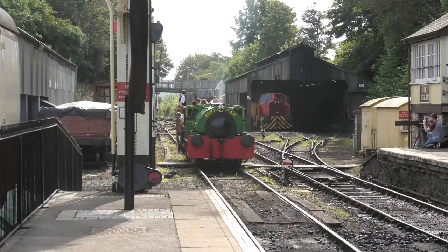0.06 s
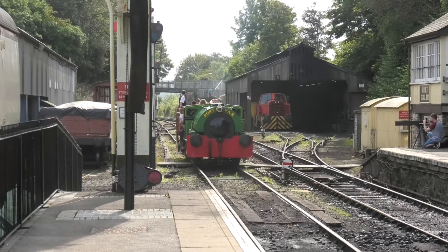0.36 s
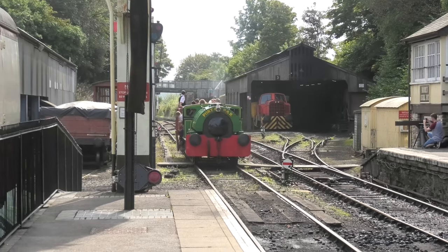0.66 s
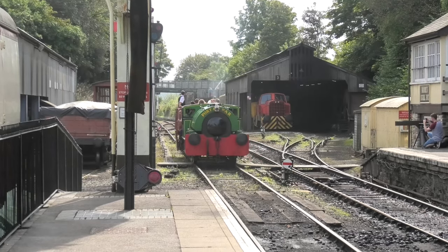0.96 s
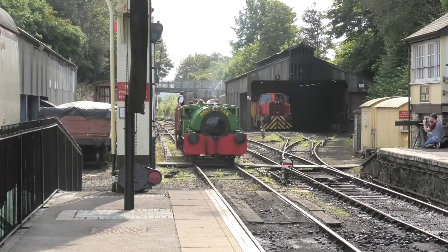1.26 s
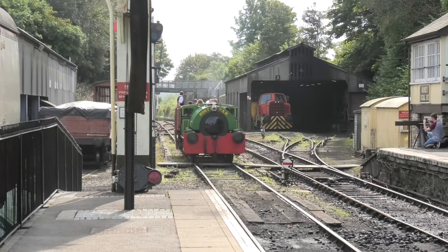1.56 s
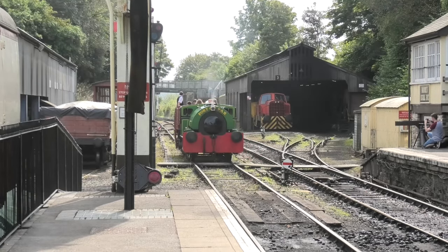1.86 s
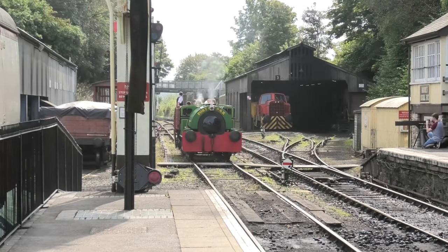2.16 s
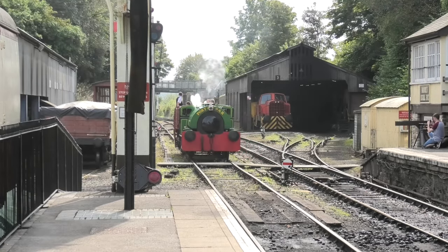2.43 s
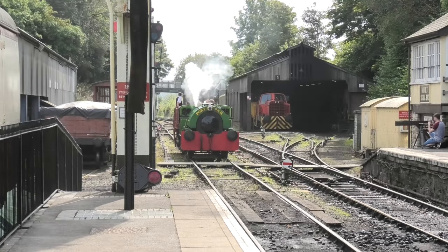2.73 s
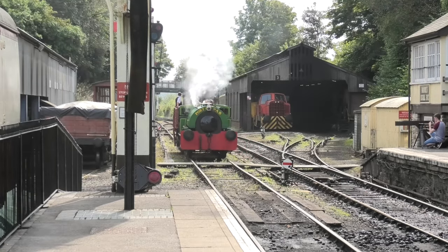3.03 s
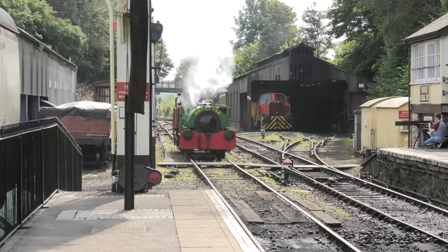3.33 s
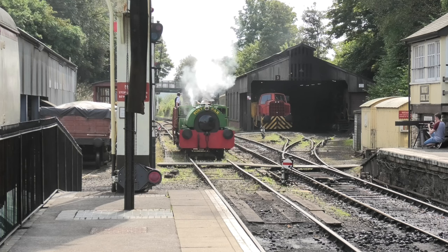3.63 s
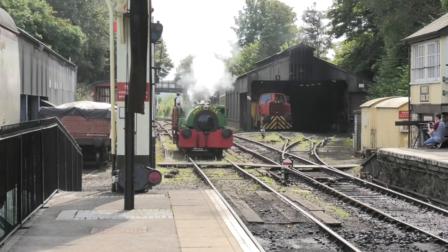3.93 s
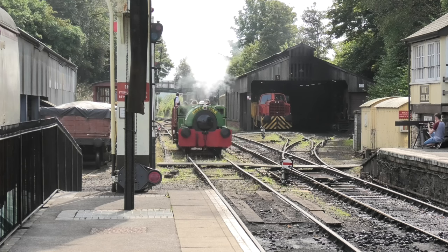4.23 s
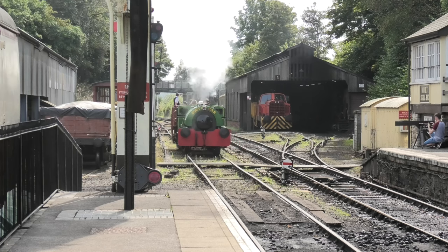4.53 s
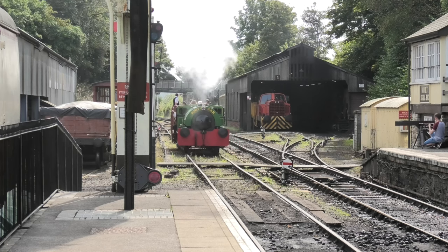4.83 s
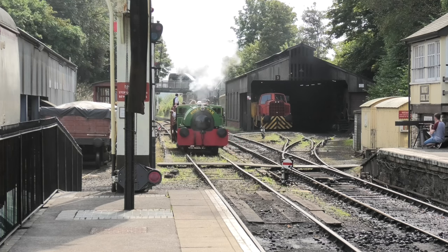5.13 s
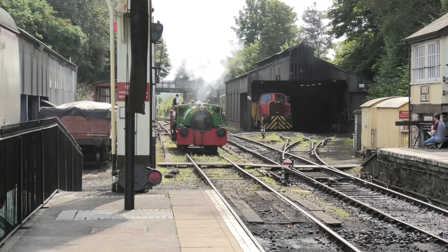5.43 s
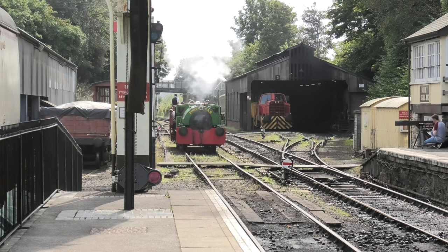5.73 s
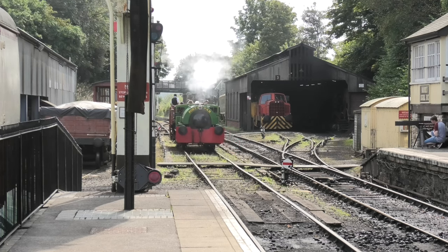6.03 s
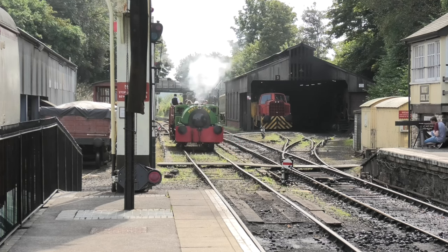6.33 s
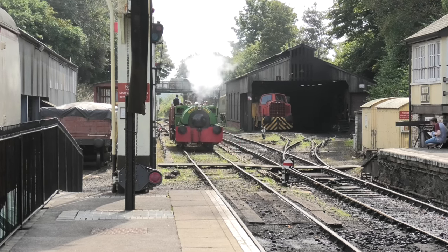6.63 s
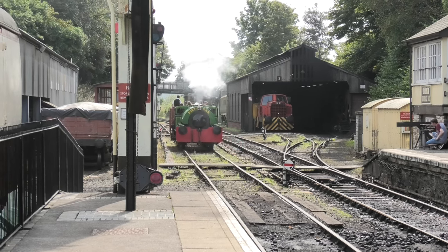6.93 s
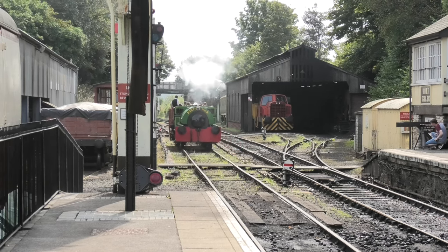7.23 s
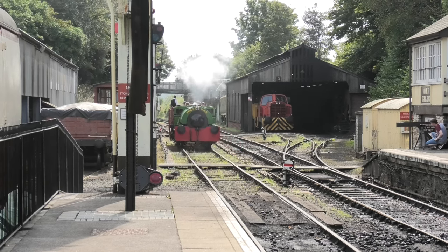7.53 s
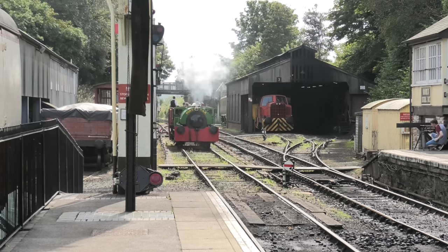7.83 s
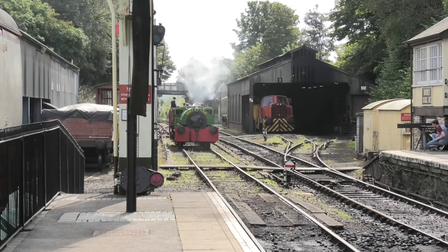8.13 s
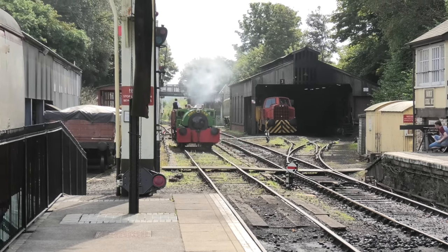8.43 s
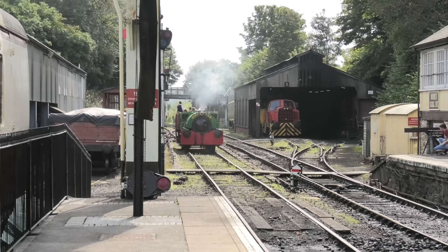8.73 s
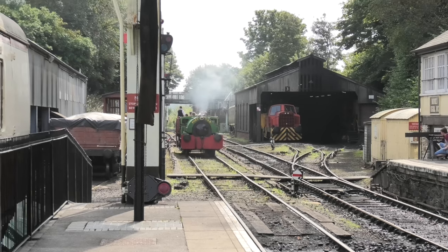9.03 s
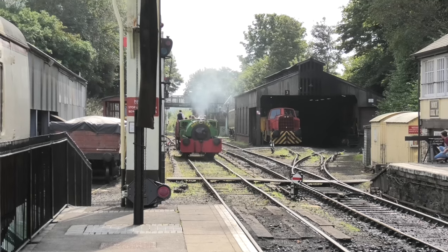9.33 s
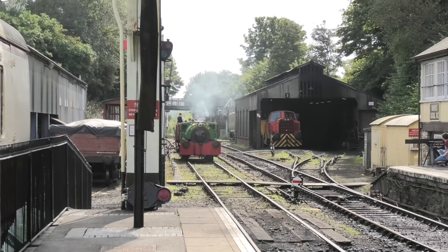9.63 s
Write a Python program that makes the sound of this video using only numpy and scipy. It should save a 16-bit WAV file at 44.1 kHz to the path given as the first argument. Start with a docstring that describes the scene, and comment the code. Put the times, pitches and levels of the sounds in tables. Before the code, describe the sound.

A small steam locomotive rolls slowly away with soft chuffs, a steady hiss, a low rumble and the thin, high note of a steam leak. Wet steam suddenly rushes out, and one loud whistle blast slides up to pitch, holds for about a second and cuts off with a brief echo. The quiet chuffing fades while the hiss carries on with a few spits, heard from a platform in an open rail yard.

```python
"""A steam whistle gives one blast: wet steam rushes out, then the whistle's bell (its hollow tube)
sounds a note that slides up to pitch and holds. It sits on a small tank engine backing away from a
platform. The engine chuffs softly, hisses, rumbles and clanks, while a steam leak sings a thin note.
Sheds and trees around the yard echo back. The sound is mono."""
import sys
import numpy as np
from scipy import signal
from scipy.fft import rfft, irfft, next_fast_len
from scipy.io import wavfile
from scipy.ndimage import uniform_filter1d, map_coordinates

SR = 44100
rng = np.random.default_rng(int(sys.argv[2]) if len(sys.argv) > 2 else 0)


def store_pcm(level_fs):
    """Save levels as 16-bit WAV."""
    pcm = np.round(np.clip(level_fs, -1, 1) * 32767).astype(np.int16)
    wavfile.write(sys.argv[1], SR, np.atleast_2d(pcm).T)


N = 426447


def amp(db):
    """Turn decibels into a gain to multiply by."""
    return 10 ** (np.asarray(db) / 20)


def unit(x):
    """Scale a sound to an average (rms) size of 1."""
    return x / np.sqrt(np.mean(x ** 2) + 1e-20)


def clock():
    """The time of every sample, in seconds."""
    return np.arange(N) / SR


def along(points, hz):
    """Read between (frequency, value) points, giving each octave equal room."""
    freqs, values = np.transpose(points)
    return np.interp(np.log(hz + 1), np.log(freqs + 1), values)


def curve(points):
    """Join (time, value) points with straight lines, one value per sample."""
    times, values = np.transpose(points)
    return np.interp(clock(), times, values)


def settling(start_s, rise_s):
    """Rise from 0 towards 1, quickly at first and then more slowly."""
    return 1 - np.exp(-np.maximum(clock() - start_s, 0) / rise_s)


def wobble(rate):
    """A smooth curve through `rate` random values a second."""
    return map_coordinates(rng.standard_normal(int(N * rate / SR) + 4), [clock() * rate])


def wavering(phase, depth, rate):
    """A trembling tone, about as strong as a steady one."""
    tone = (1 + depth * wobble(rate)) * np.sin(phase) + depth * wobble(rate) * np.cos(phase)
    return tone / np.sqrt(1 + 2 * depth ** 2)


def filtered(x, response):
    """Turn each frequency of x up or down by response(hz)."""
    size = next_fast_len(N + SR // 2)
    return irfft(rfft(x, size) * response(np.fft.rfftfreq(size, 1 / SR)), size)[..., :N]


def resonance(hz, centre_hz, width_hz):
    """How something that rings at centre_hz answers each frequency."""
    return 1j * hz * width_hz / (centre_hz ** 2 - hz ** 2 + 1j * hz * width_hz)


def rush(colour, patchy_db):
    """Rushing noise with random loud and soft patches; colour sets the balance of low and high."""
    spectrum = signal.stft(rng.standard_normal(N), nperseg=512)[2]
    patches = uniform_filter1d(rng.standard_normal(spectrum.shape), size=5, axis=0)
    patches = uniform_filter1d(patches, size=9, axis=1)
    noise = signal.istft(spectrum * amp(patchy_db * unit(patches)), nperseg=512)[1][:N]
    low_hz, high_hz = colour[0][0], colour[-1][0]
    edge_fade = lambda hz: np.minimum(1, hz / low_hz) ** 2 / np.maximum(1, hz / high_hz) ** 2
    return unit(filtered(noise, lambda hz: amp(along(colour, hz)) * edge_fade(hz)))


def puffs(rows, sharpness, rise_s, fall_s):
    """A noise burst for each (time, level, frequency) row; more sharpness makes it more like a note."""
    out = np.zeros(N + 2 * SR)  # a spare second at each end
    t = np.arange(-SR // 4, SR // 4) / SR
    hz = np.fft.rfftfreq(len(t), 1 / SR)
    shape = np.exp(-(np.minimum(t, 0) / rise_s) ** 2 - np.maximum(t, 0) / fall_s)
    for peak_s, db, centre_hz in rows:
        band = resonance(hz, centre_hz, centre_hz / sharpness) ** 2
        noise = irfft(rfft(rng.standard_normal(len(t))) * band, len(t))
        start = round((peak_s + 1 + t[0]) * SR)
        out[start:][:len(t)] += amp(db) * unit(noise * shape) * np.sqrt(np.mean(shape ** 2))
    return out[SR:SR + N]


# How late and how strongly each wall answers: t/s, level/dB
WALL_ECHOES = [(.06, -26), (.19, -25), (.29, -24), (.69, -40.5)]
# How long the yard's ring takes to fade by 60 dB: f/Hz, t/s
YARD_FADE = [(200, 0.48), (600, 0.88), (2000, 0.8), (6000, 0.79), (14000, 0.39)]
# Leaves scatter high sounds more than low ones: f/Hz, level/dB
LEAF_SCATTER = [(600, -14), (1400, -9.5), (3500, -11), (8000, -7)]
def yard(x, dull_above_hz=1800):
    """Sheds send back dull echoes; trees and platforms add a soft, fading tail."""
    hz, t, spectrum = signal.stft(rng.standard_normal(SR), SR, nperseg=256)
    fade = amp(-60 * t / along(YARD_FADE, hz)[:, None])
    tail = signal.istft(spectrum * fade, SR, nperseg=256)[1]
    scattered = signal.fftconvolve(x, tail / np.linalg.norm(tail))[:N]
    scattered = filtered(scattered, lambda f: amp(along(LEAF_SCATTER, f)))
    echoes = sum(amp(db) * np.pad(x, (round(delay_s * SR), 0))[:N] for delay_s, db in WALL_ECHOES)
    return scattered + filtered(echoes, lambda f: 1 / (1 + (f / dull_above_hz) ** 2))


# How loud the hollow tone is: t/s, level/dB
DRONE_LEVEL = [(0, -79), (1.2, -80), (2, -89), (5.5, -79), (6.5, -75.5), (7.8, -70.5), (8.3, -83)]
def drone(pitch_hz=718):
    """A faint, fuzzy, hollow tone as the engine rolls away."""
    tone = wavering(2 * np.pi * pitch_hz * clock(), depth=.9, rate=22)
    return amp(curve(DRONE_LEVEL)) * unit(tone)


# How loud the rumble is: t/s, level/dB
RUMBLE_LEVEL = [(0, -57.5), (1.9, -60.5), (2.45, -55.5), (4.8, -59), (6.9, -58.5), (7.8, -61.5),
                (9.67, -61)]
# Its deep tone colour: f/Hz, level/dB
RUMBLE_COLOUR = [(30, -24), (50, -8), (100, -6.5), (125, -4), (175, 1), (240, 1.5), (330, -3.5), (420, -10),
                 (700, -10.5), (900, -18)]
def rumble():
    """The wheels and rods rumble as the engine rolls."""
    return amp(curve(RUMBLE_LEVEL)) * rush(RUMBLE_COLOUR, patchy_db=1.5)


# Tone colour of the boiler: f/Hz, level/dB
SIMMER_COLOUR = [(400, -20), (720, -22.5), (850, -10), (1130, -9), (1250, -1), (1390, 0.5), (1490, -2.5),
                 (1640, 2), (1880, -7.5), (2120, -0.5), (2300, -2), (2600, -9), (3300, -16), (5000, -53)]
def simmer(level_db=-54.0, start_m=32, speed_m_per_s=1.07):
    """The boiler simmers, growing fainter as the engine backs away."""
    nearness = start_m / (start_m + speed_m_per_s * clock())
    return nearness * amp(level_db + 0.74 * wobble(3.85)) * rush(SIMMER_COLOUR, patchy_db=1.0)


# One high squeal and one low groan: t/s, level/dB, f/Hz
GROANS = [(.1, -54.5, 1387), (2.32, -59, 182.4)]
def groans():
    """Steel briefly squeals and groans as the engine rolls."""
    return puffs(GROANS, sharpness=20, rise_s=.12, fall_s=0.073)


# Knocks of metal on metal: t/s, level/dB, f/Hz
CLANKS = [(1.37, -46, 199), (1.38, -59, 11000), (1.39, -54, 895), (4.345, -59.5, 9000), (7.75, -57, 1043),
          (8.1, -57, 990)]
def clanks():
    """The moving rods clank and tick."""
    return puffs(CLANKS, sharpness=2.3, rise_s=0.0034, fall_s=0.02)


# Spits of steam, before distance dulls them: t/s, level/dB, f/Hz
SPITS = [(1.375, -47, 2950), (4.34, -53, 7000), (6.8, -51, 4950), (7.46, -56, 5040), (7.65, -56, 3960),
         (8.61, -50.5, 4460), (8.74, -50, 4600), (8.81, -50.5, 5540)]
def spits(dull_above_hz=9000):
    """Wet steam spits in short, spluttering bursts; distance takes their edge off."""
    bursts = amp(2.3 * wobble(150)) * puffs(SPITS, sharpness=1.02, rise_s=0.025, fall_s=0.045)
    return filtered(bursts, lambda hz: 1 / np.sqrt(1 + (hz / dull_above_hz) ** 10))


# How loud the sizzle is: t/s, level/dB
SIZZLE_LEVEL = [(0, -78), (5.3, -66.5), (6.5, -62), (6.8, -70), (7.0, -56.5), (7.35, -56.5), (7.65, -67),
                (7.9, -64), (8.2, -82)]
# Its narrow tone colour: f/Hz, level/dB
SIZZLE_COLOUR = [(4100, -17), (4420, 4), (4600, 0), (4750, 3), (4920, -34)]
def sizzle():
    """A thin, high sizzle in the steam escaping at the rod seals."""
    return amp(curve(SIZZLE_LEVEL)) * rush(SIZZLE_COLOUR, patchy_db=3.5)


# Tone colour of the hiss facing the platform: f/Hz, level/dB
HISS_NEAR = [(1500, -14), (2250, 5.5), (2650, 4.5), (2850, 10.5), (3400, 6), (3700, 7.5), (4300, 2),
             (4650, 5), (5200, -3.5), (5600, 0), (7800, -7), (9100, -7.5), (13300, -21.5), (15700, -30)]
# Its colour from farther down the line: f/Hz, level/dB
HISS_FAR = [(2000, -32), (2900, 1), (3300, 3), (3720, 4), (4150, 1), (4680, 1), (4900, -4.5), (5330, -3.5),
            (5580, -1), (6300, -3.5), (7800, -7.5), (9100, -8), (12000, -18), (15000, -32)]
# How the hiss swells and sinks: t/s, level/dB
HISS_SWELL = [(0, -59.5), (1.2, -57.3), (1.9, -60), (2.3, -57.3), (4.3, -57.3), (5.3, -60.3), (5.62, -53.8),
              (6.4, -53.6), (7.5, -54.5), (7.8, -60.5), (8.3, -57.5), (9.15, -60.5), (9.67, -56)]
def seal_hiss(near_db=4, splutter_db=1.48, surge_db=1.22, ground_db=-14, ground_delay_s=0.001063):
    """Steam hisses past the seals around the rods; drops of water make it splutter."""
    far = rush(HISS_FAR, patchy_db=2.0)
    # from farther off, the hiss also bounces off the ground
    ground_bounce = lambda hz: 1 + amp(ground_db) * np.exp(-2j * np.pi * hz * ground_delay_s)
    far = unit(filtered(far, ground_bounce))
    near = amp(near_db) * rush(HISS_NEAR, patchy_db=0.6)
    far_share = np.clip((clock() - 4.3) / 1.7, 0, 1)
    hiss = np.sqrt(1 - far_share) * near + np.sqrt(far_share) * far
    return hiss * amp(curve(HISS_SWELL) + splutter_db * wobble(220) + surge_db * wobble(35))


# Start and chuff strength of each wheel turn, quickening until the driver eases off: t/s, level/dB
WHEEL_TURNS = [(.11, -54), (1.16, -54), (2.18, -57), (3.17, -57), (4.13, -54.5), (5.04, -56.5), (5.93, -55),
               (6.81, -59.5), (7.71, -64), (8.61, -67), (9.52, -64)]
# The beats within one turn: share of the turn, added level/dB, f/Hz
TURN_BEATS = [(0, 2, 340), (.215, 0, 310), (.475, -.5, 305), (.75, -0.5, 320)]
def chuffs():
    """Used steam puffs from the chimney in four uneven beats for each turn of the wheels."""
    starts, levels = np.transpose(WHEEL_TURNS)
    lengths = np.pad(np.diff(starts), (0, 1), mode="edge")
    beats = [(start + share * length, level + db, hz)
             for start, level, length in zip(starts, levels, lengths)
             for share, db, hz in TURN_BEATS]
    heard = [beat for beat in beats if beat[0] < N / SR]
    return puffs(heard, sharpness=1.56, rise_s=0.026, fall_s=0.026)


# Pitch of the leak's note: t/s, f/Hz
LEAK_PITCH = [(0, 2352), (1.3, 2365), (4.25, 2367), (4.9, 2373), (5.5, 2375), (6.9, 2370), (8, 2373),
              (9.67, 2373)]
# How the note swells and dips: t/s, level/dB
LEAK_SWELL = [(0, -49.5), (1.3, -45), (1.98, -51.5), (2.1, -47.5), (2.6, -49.5), (3.9, -48), (4.5, -54),
              (4.75, -49.5), (5.3, -50.5), (6.25, -47.5), (6.4, -62), (6.52, -46.5), (7.38, -54.5),
              (7.52, -49), (8.1, -51), (8.32, -62), (8.58, -49.5), (8.84, -48), (8.94, -56), (9.02, -46),
              (9.48, -46), (9.58, -54), (9.67, -47)]
def leak(gain_db=-1.5, drift_hz=3, flicker_db=1.0):
    """Leaking steam blows across an edge and sings a thin, unsteady note."""
    phase = 2 * np.pi * np.cumsum(curve(LEAK_PITCH) + drift_hz * wobble(25)) / SR
    loudness = amp(curve(LEAK_SWELL) + gain_db + flicker_db * wobble(10))
    return loudness * unit(wavering(phase, depth=0.27, rate=60))


# The whistle's valve opens, the note starts once the water has blown clear, the valve shuts
OPEN_S, NOTE_START_S, SHUT_S = 2.432, 2.783, 3.977
def valve(opening_s=.02, closing_s=.012):
    """How far the whistle's valve is open, from 0 to 1: it snaps open and springs shut."""
    t = clock()
    return np.clip((t - OPEN_S) / opening_s, 0, 1) * np.exp(-np.maximum(t - SHUT_S, 0) / closing_s)


# Two low, hoarse coughs: t/s, level/dB, f/Hz
COUGHS = [(2.515, -48, 300), (2.755, -49, 410)]
def coughs():
    """The whistle coughs while it is still full of water."""
    return puffs(COUGHS, sharpness=1.9, rise_s=.035, fall_s=.035)


# Tone colour of the steam jet: f/Hz, level/dB
JET_COLOUR = [(150, -33), (450, -12.5), (750, -12), (1100, -11), (1400, -5.5), (1900, 0), (2450, -4),
              (2950, 3), (3250, -1), (3650, 1), (4350, -4.5), (5000, -3), (6500, -10.5), (9000, -32)]
# Tone colour of the fine spray: f/Hz, level/dB
SPRAY_COLOUR = [(2500, -23), (4500, -4), (5500, -2.5), (6400, -5.5), (7200, 1.5), (8000, -4.5),
                (9100, -1.5), (10500, -7.5), (12500, -9.5), (15700, -15)]
# Spurts of water that boost the spray: t/s, added level/dB, fade t/s
WATER_SPURTS = [(3.08, 5, 0.24), (3.34, 5.5, 0.034)]
def steam_jet(wet_db=-39, dry_db=-31.5, spray_db=-37, lag_s=.028):
    """Steam and spray tear through the whistle's slot; the steam rushes harder once it runs dry."""
    surge = amp(0.38 * wobble(40))
    steam_db = wet_db + (dry_db - wet_db) * settling(NOTE_START_S, rise_s=.09)
    steam = amp(steam_db) * rush(JET_COLOUR, patchy_db=2.1)
    steam *= settling(OPEN_S + lag_s, rise_s=.012)  # starts a moment after the spray
    spurts_db = 0
    for peak_s, db, fade_s in WATER_SPURTS:
        rise = np.clip((clock() - peak_s) / 0.052 + 1, 0, 1)
        spurts_db += db * rise * (1 - settling(peak_s, fade_s))
    spray = amp(spray_db + spurts_db) * rush(SPRAY_COLOUR, patchy_db=2.0)
    spray *= settling(OPEN_S, rise_s=0.086)
    return surge * (steam + spray)


# Where the air inside the bell rings: f/Hz, width/Hz, relative level/dB
BELL_RESONANCES = [(1664, 71, 1.5), (1896, 58, 9.5), (2890, 110, -1), (3130, 120, 2), (3600, 110, 7),
                   (3890, 58, -8), (4605, 140, -10), (5570, 66, 3), (6060, 36, 1), (6920, 120, 0.5)]
def bell_air(level_db=-36.5):
    """The jet stirs the air in the whistle's bell into a high, breathy ringing."""
    ringing = sum(filtered(rng.standard_normal(N), lambda hz: amp(db) * resonance(hz, centre, width))
                  for centre, width, db in BELL_RESONANCES)
    return amp(level_db) * settling(NOTE_START_S, rise_s=0.014) * unit(ringing)


# The pitch the whistle slides up to, drifting with the steam pressure: t/s, f/Hz
WHISTLE_PITCH = [(3.15, 576), (3.43, 581), (3.7, 575), (3.81, 565), (3.87, 573), (4.0, 575)]
# How loud its lowest tone is: t/s, level/dB
WHISTLE_LEVEL = [(2.795, -26.5), (2.831, -32.5), (2.897, -23), (2.919, -30), (3.031, -26), (3.421, -24),
                 (3.553, -19.5), (3.655, -29.5), (3.731, -20), (3.793, -27), (3.849, -19.5), (3.965, -25),
                 (3.98, -21)]
# The balance of higher tones shifts as the bell warms: multiple of pitch, cool level/dB, warm level/dB
OVERTONES = [(2, -7, -7), (3, -2.5, -2.5), (4, -12, -0.5), (5, -5, -6.5), (6, -3, -6.5), (7, -20, -9.5),
             (8, -3, -17), (9, -10, -20)]
def whistle(slide_hz=54, slide_s=.092, jitter=0.00283, breath_db=-38, overtone_db=-36.5, flutter=0.54):
    """The note starts low and slides up as hot steam fills the bell; the swirling jet shakes it."""
    pitch = curve(WHISTLE_PITCH) - slide_hz * (1 - settling(NOTE_START_S, slide_s))
    phase = 2 * np.pi * np.cumsum(pitch * (1 + jitter * wobble(110))) / SR
    breath = amp(breath_db) * (wobble(200) * np.sin(phase) + wobble(200) * np.cos(phase))
    note = settling(NOTE_START_S, rise_s=.008) * amp(curve(WHISTLE_LEVEL)) * (np.sin(phase) + breath)
    warmth = np.clip((clock() - 3) / 0.66, 0, 1)
    for multiple, cool_db, warm_db in OVERTONES:
        level_db = overtone_db + cool_db + warmth * (warm_db - cool_db) + 0.7 * wobble(14)
        # higher tones build up more slowly and tremble more
        build_up = settling(NOTE_START_S, rise_s=.00375 * (multiple - 1) ** 2)
        tone = wavering(multiple * phase, depth=flutter * multiple / 4, rate=45)
        note += build_up * amp(level_db) * tone
    return np.sqrt(2) * note


def scene():
    """Whistle and engine echo in the yard; the two thin tones stay dry. Both channels are the same."""
    blast = valve() * (coughs() + whistle() + steam_jet() + bell_air())
    engine = seal_hiss() + sizzle() + simmer() + rumble() + chuffs() + spits() + clanks() + groans()
    direct = blast + engine
    return np.tile(direct + yard(direct) + leak() + drone(), (2, 1))


def record(dry, top_hz=15720):
    """Cut away the very highest treble."""
    return filtered(dry, lambda hz: hz < top_hz)


dry = scene()
out = record(dry)
store_pcm(out)
```